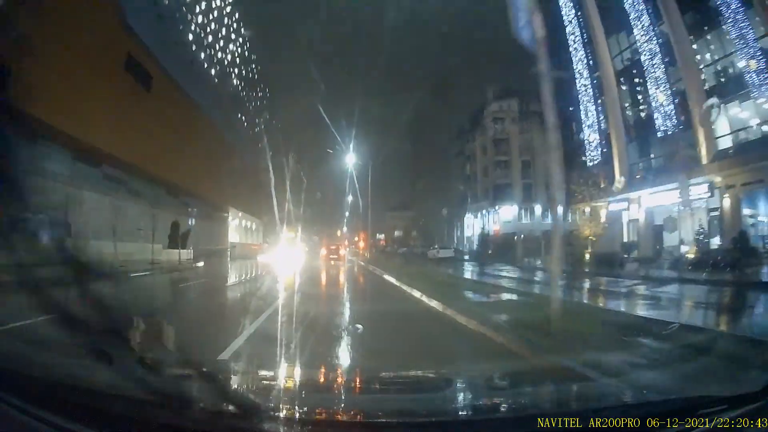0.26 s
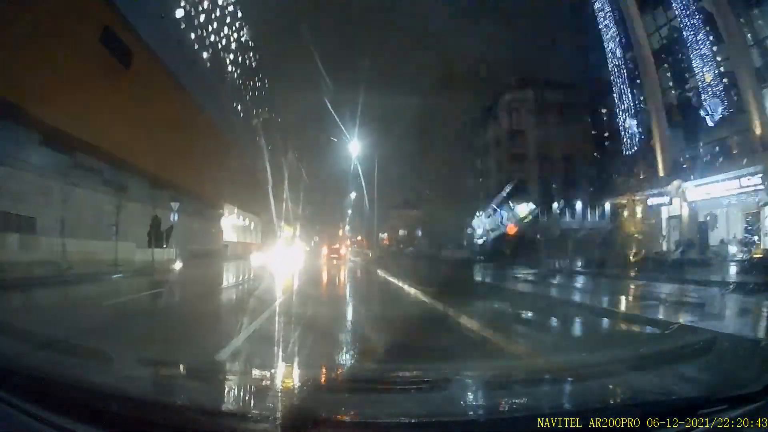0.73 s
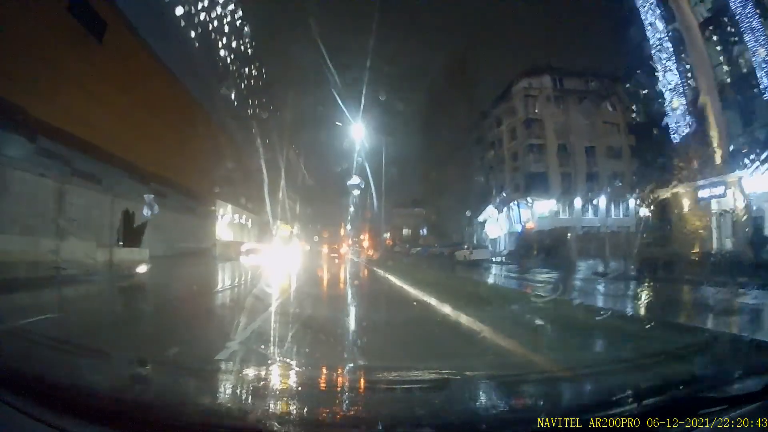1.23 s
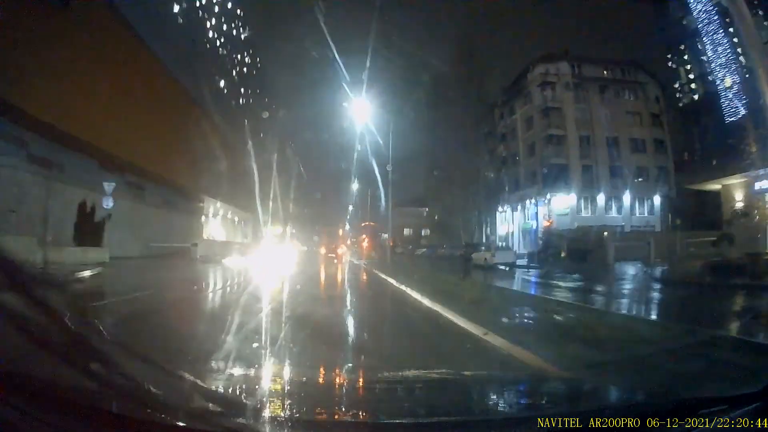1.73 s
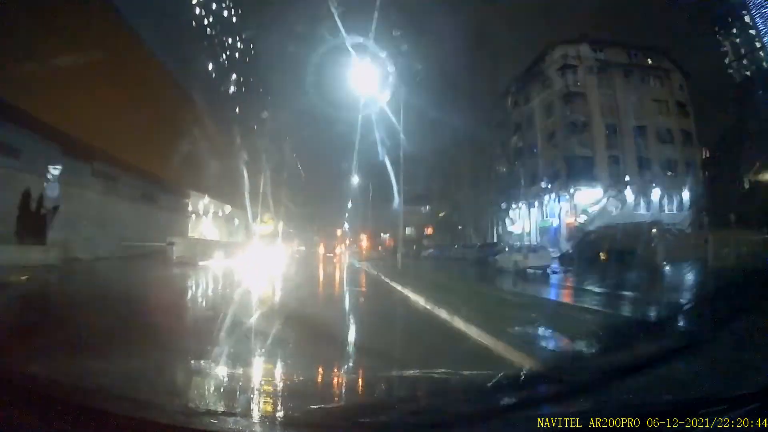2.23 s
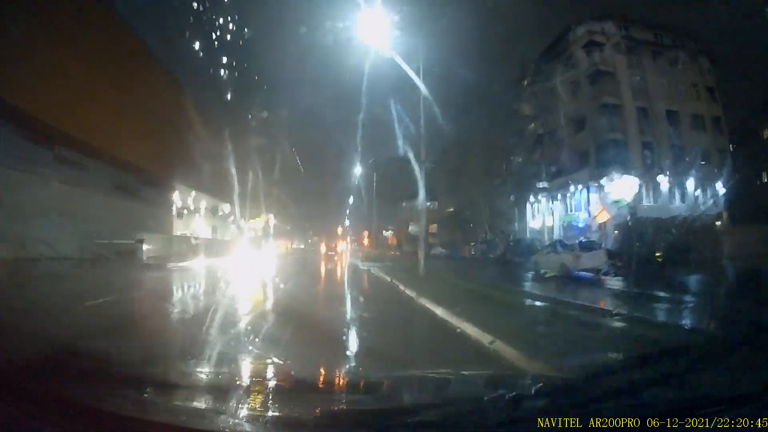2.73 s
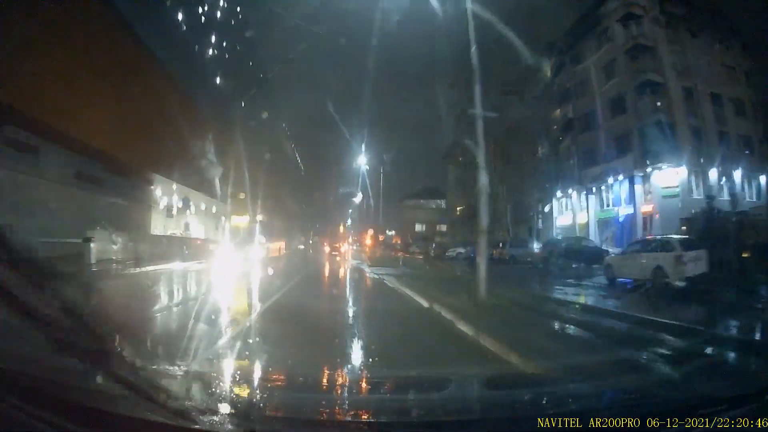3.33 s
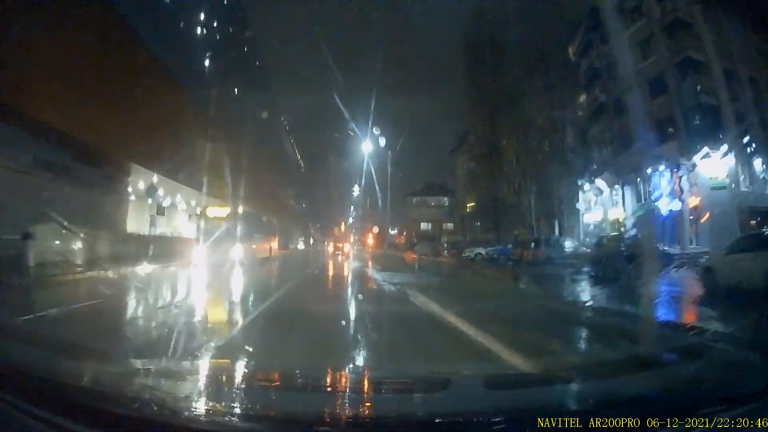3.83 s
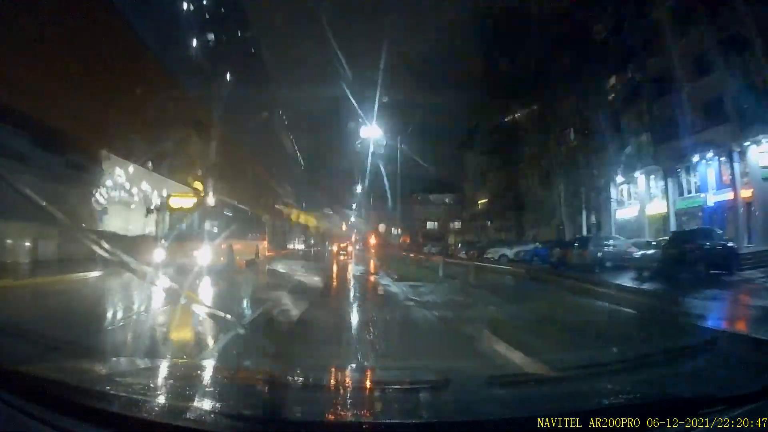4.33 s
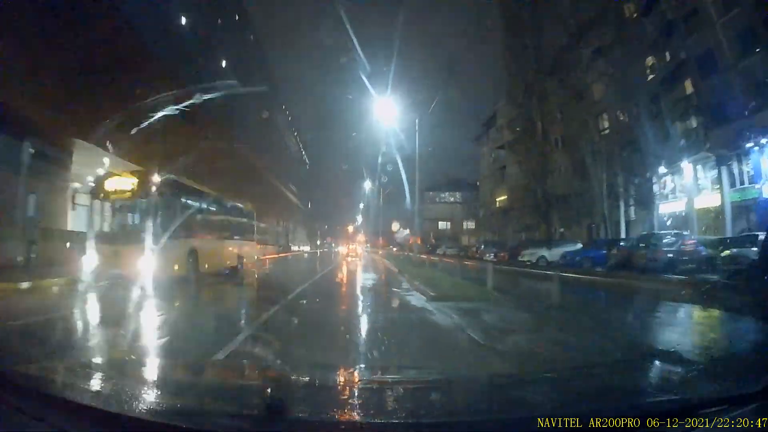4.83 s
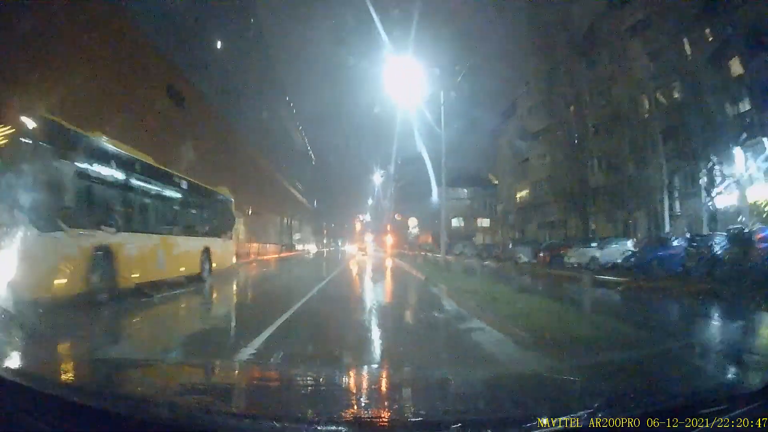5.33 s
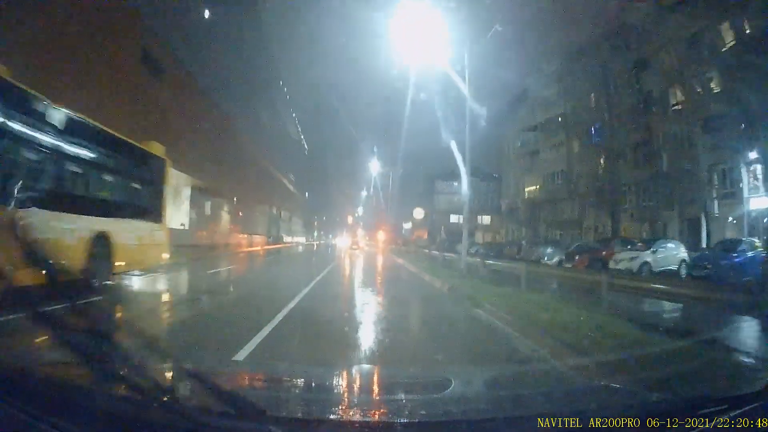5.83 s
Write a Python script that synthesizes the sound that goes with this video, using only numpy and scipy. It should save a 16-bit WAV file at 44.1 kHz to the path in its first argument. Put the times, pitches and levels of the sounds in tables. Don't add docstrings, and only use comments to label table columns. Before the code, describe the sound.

A small car cabin heard through a cheap, overloaded dashboard microphone. A road bump opens as a wiper stroke finishes. The low engine hum rises slightly, with soft tyre rumble and ticking raindrops. Further strokes stutter and squeak on the windscreen, each followed by a scuffing flip. Rough road rumbles around four seconds, the engine slackens, a last long squeak comes, and finally a deep bump.

```python
import sys
import numpy as np
from scipy import signal
from scipy.fft import rfft, irfft, next_fast_len
from scipy.io import wavfile
from scipy.ndimage import uniform_filter1d, map_coordinates

SR = 44100
rng = np.random.default_rng(int(sys.argv[2]) if len(sys.argv) > 2 else 0)


def store_pcm(level_fs):
    pcm = np.round(np.clip(level_fs, -1, 1) * 32767).astype(np.int16)
    wavfile.write(sys.argv[1], SR, np.atleast_2d(pcm).T)


def ratio(d):
    e = np.asarray(d, float) / 20
    return 10 ** e


N = 267687
T = np.arange(N) / SR


def unit(x):
    return x / np.sqrt(np.mean(x ** 2) + 1e-20)


def along(points, hz):
    f, v = np.transpose(points)
    return np.interp(np.log(hz + 1), np.log(f + 1), v)


def curves(rows):
    s, *cols = np.transpose(rows)
    return [np.interp(T, s, c) for c in cols]


def gate(tables, fade, tail):
    total = 0
    for rows in tables:
        inside_s = np.minimum(T - rows[0][0] + fade, rows[-1][0] + tail - T)
        total = total + np.clip(inside_s / fade, 0, 1)
    return np.clip(total, 0, 1)


def swell(s, half_s):
    return np.exp(-((T - s) / half_s) ** 4)


def wobble(rate):
    return map_coordinates(rng.standard_normal(int(N * rate / SR) + 4), [T * rate])


def filtered(x, response):
    m = next_fast_len(N + SR // 2)
    return irfft(rfft(x, m) * response(np.fft.rfftfreq(m, 1 / SR)), m)[..., :N]


def noise(spectrum):
    return unit(filtered(rng.standard_normal(N), lambda hz: ratio(along(spectrum, hz))))


def body(modes):
    def response(f):
        total = 0
        for k, (c, width, db) in enumerate(modes):
            total = total + (-1) ** k * ratio(db) * 1j * f * width / (c * c - f * f + 1j * f * width)
        return total
    return response


def grains(rate, spread_db):
    draw = rng.random((3, N))
    return (draw[0] < rate / SR) * np.sign(draw[1] - .5) * ratio(-spread_db * np.log(draw[2] + 0.00043))


def steady(x, span_s):
    return x / np.sqrt(np.abs(uniform_filter1d(x ** 2, int(span_s * SR))) + 1e-12)


# frequency in Hz, level in dB per Hz.
THUMP = [(8, -20), (18, -4), (38, 0), (47, -3), (56, -8), (70, -9), (85, -12), (130, -17), (180, -28),
         (400, -120)]
# frequency in Hz, level in dB per Hz.
ROAR = [(88, -22.5), (150, 4.5), (178, -3.5), (210, 1), (237, -0.5), (463, -0.5), (591, -6.5), (702, -5.5),
        (843, -9), (1220, -11.5), (1700, -28.5), (2210, -59), (3740, -120)]
# frequency in Hz, level in dB per Hz.
SPRAY = [(940, -26), (1600, -4.5), (1780, -0.5), (2370, -3), (2970, 1.5), (3180, -2), (3750, -5.5),
         (4280, -11.5), (5560, -47), (9420, -120)]
# centre in seconds, rise in dB, half length in seconds.
PATCHES = [
    (0.05, 5.5, .08),
    (3.764, 3.5, 0.061),
    (3.979, 8, 0.1),
    (4.499, 2.5, 0.18),
]


def road(turn):
    thump_db = -20.5 + sum(db * swell(s, half_s) for s, db, half_s in PATCHES)
    thump = ratio(thump_db) * unit(ratio(3.1 * wobble(14)) * noise(THUMP))
    roar = ratio(-33.5) * unit(ratio(0.28 * wobble(7) + 0.91 * np.sin(turn)) * noise(ROAR))
    puff = ratio(-60 * np.arange(SR // 20) / SR / 0.014)
    splat = signal.fftconvolve(np.abs(grains(rate=50, spread_db=-2)), puff)[:N]
    drops = unit(splat * noise(SPRAY))
    hiss = unit(ratio(0.59 * wobble(35)) * noise(SPRAY))
    return thump + roar + ratio(-55) * (hiss + ratio(-2.5) * drops)


# start in seconds, peak in dB, body pitch in Hz, t60 in seconds.
BUMPS = [
    (-.005, -9, 48, .1),
    (6.047, -3, 50, 1),
]


def bumps():
    total = 0
    for s, db, hz, t60 in BUMPS:
        decay = ratio(db - 60 * np.abs(T - s) / t60) * (T > s)
        total = total - decay * np.sin(2 * np.pi * hz * (T - s))
    return total


# time in seconds, firing rate in Hz.
REVS = [(0.06, 48.9), (0.76, 51.3), (1.14, 52.5), (1.55, 53.0), (1.9, 53.7), (2.18, 54.7), (2.6, 55.5),
        (4.16, 55.56), (4.46, 55.1), (4.82, 54.4), (5.13, 54.0), (5.46, 53.1), (5.8, 51.8)]
# time in seconds, level in dB.
BOOM = [(0.0, -11), (0.25, -10), (1.52, -17.5), (1.55, -32.5), (1.64, -22.5), (1.94, -37), (2.06, -17),
        (2.28, -13), (3.76, -11), (5.05, -14.5), (5.15, -27), (5.26, -19), (5.37, -31), (5.42, -22),
        (5.74, -25), (5.84, -19), (5.91, -26), (6.06, -40)]
# multiple of the firing rate, level in dB re the second order.
CRANK = [(.5, -4), (1.5, -21), (2.5, -11.5), (3, -21), (4, -24.5)]
# time in seconds, frequency in Hz, level in dB.
WHINE = [(0, 677, -51.5), (.5, 699.5, -42.5), (1, 712, -41), (1.7, 739.5, -45), (2.3, 753, -53.5),
         (4, 778, -54.5), (6.07, 725, -55)]


def engine():
    (rate_hz,), (boom_db,) = curves(REVS), curves(BOOM)
    turn = 2 * np.pi * np.cumsum(rate_hz) / SR - np.pi / 2
    boom = ratio(boom_db + 0.86 * wobble(13)) * np.sin(turn + 0.27 * wobble(13))
    throttle_closed = np.clip((T - 4.34) / 0.23, 0, 1)
    second_db = -27 - 5.5 * throttle_closed + 3.1 * wobble(2)
    orders = np.sin(2 * turn - 1.6)
    for multiple, db in CRANK:
        orders = orders + ratio(db + 2.8 * wobble(9.3)) * np.sin(multiple * turn)
    unsteady = ratio(1.6 * wobble(12))
    whine_hz, whine_db = curves(WHINE)
    whine_phase = 2 * np.pi * np.cumsum(whine_hz) / SR + .5 * wobble(25)
    whine = ratio(whine_db + 4.6 * wobble(30)) * np.sin(whine_phase)
    return np.sqrt(2) * (boom + ratio(second_db) * unsteady * orders + whine), turn


def cabin(x):
    t = np.arange(SR // 8) / SR
    tail = rng.standard_normal(len(t)) * ratio(-60 * t / 0.063)
    return signal.fftconvolve(x, tail / np.linalg.norm(tail))[:N]


# time in seconds, peak in dB.
SNAPS = [(0.0263, -27.5), (0.1116, -30.5), (0.616, -33.5), (1.178, -35.5), (1.2243, -23), (1.3422, -29),
         (1.6, -30.5), (1.7471, -31), (2.5793, -33.5), (2.6422, -29), (2.6616, -24), (2.722, -35.5),
         (2.744, -25), (2.7762, -30), (2.814, -29.5), (3.5232, -31), (3.822, -31), (3.9687, -34.5),
         (4.0265, -24), (4.0614, -24.5), (4.0887, -24), (4.509, -35.5), (4.5733, -32), (4.8276, -29),
         (5.2283, -33), (5.38, -35), (5.4183, -31), (5.4533, -34), (5.4852, -30), (5.5138, -28)]


def snaps():
    out, t = np.zeros(N + SR), np.arange(SR // 50) / SR
    for s, db in SNAPS:
        tick = ratio(db - 0.5 - 60 * t / 0.021) * rng.standard_normal(len(t))
        out[round(s * SR):][:len(t)] += tick
    return filtered(out[:N], lambda hz: ratio(along(SPRAY, hz) + 2.5))


# start in seconds, scuff in dB, hold in seconds.
FLIP = [
    (0.183, -25, 0.022),
    (1.558, -24.5, 0.026),
    (2.941, -20, 0.02),
    (3.937, -25.5, .002),
    (4.329, -23.5, .024),
    (5.705, -22, 0.039),
]
# frequency in Hz, width in Hz, level in dB.
ARM = [(390, 150, -8), (528, 86, 0), (766, 83, 2.5), (1070, 230, -5), (1190, 225, -8)]
# frequency in Hz, level in dB.
CABIN_COLOUR = [(200, 3), (1350, -2), (1550, -7.5), (2200, -11), (4400, -18)]


def flip():
    rise_s, fall_db_per_s = 0.011, 722
    push = 0
    for s, db, hold_s in FLIP:
        falling_s = np.clip(T - s - rise_s - hold_s, 0, 1)
        push = push + np.clip((T - s) / rise_s, 0, 1) * ratio(db - fall_db_per_s * falling_s)
    scuff = filtered(grains(rate=2700, spread_db=2.0), lambda hz: body(ARM)(hz) * ratio(along(CABIN_COLOUR, hz)))
    return push * steady(scuff, span_s=0.021)


def rubber_chatter():
    chatter = ratio(2.5 * wobble(58)) * grains(rate=2000, spread_db=3.0)
    snap_s, snap_db = np.transpose(SNAPS)
    chatter[np.round(snap_s * SR).astype(int)] = ratio(snap_db + 43.5)
    return chatter


# frequency in Hz, width in Hz, level in dB.
GROAN = [(200, 70, -6), (300, 50, 0)]


def arm_groan(chatter):
    return steady(filtered(chatter, lambda hz: body(GROAN)(hz) ** 2), span_s=0.018)


# frequency in Hz, width in Hz, level in dB.
GLASS = [(450, 16, -4), (747.6, 88, 1.5), (1050, 45, -6), (1169, 12, 1.5), (1390, 160, -12.5),
         (1740, 300, -17), (2130, 300, -16), (3050, 780, -24)]


def glass_judder(chatter, bright_db):
    dull = steady(filtered(chatter, lambda hz: body(GLASS)(hz) * ratio(along(CABIN_COLOUR, hz))), span_s=.09)
    sharp = filtered(dull, lambda hz: hz > 1500)
    return dull + (ratio(bright_db) - 1) * sharp


# frequency in Hz, level in dB.
LIP = [(600, -8.5), (800, 9), (1250, -3), (1500, -21), (1750, -14), (2200, -33.5), (3000, -38.5),
       (4200, -54)]


def squeak(slip_hz, first_db, squeak_db, third_db, bright_db):
    slip = 2 * np.pi * np.cumsum(slip_hz * (1 + .02 * wobble(140))) / SR
    total = 0
    for k in range(1, 9):
        level_db = squeak_db + along(LIP, k * slip_hz) - along(LIP, 2 * slip_hz) + bright_db * (k > 3)
        if k == 1:
            level_db = first_db
        elif k == 3:
            level_db = third_db
        phase = k * (slip + .2 * wobble(110))
        total = total + ratio(level_db + 1.6 * wobble(90)) * np.sin(phase)
    return total


# time in seconds, slip rate in Hz, grip in dB.
BLADE = [
    [(0.0, 383.9, -23.5), (0.03, 394.8, -19), (0.05, 397.2, -16), (0.07, 385.1, -15.5), (0.095, 386.3, -24),
     (0.118, 396.3, -18), (0.135, 409, -24), (0.15, 481, -35.5)],
    [(1.178, 374.4, -18), (1.22, 352.7, -18), (1.25, 360.4, -21.5), (1.29, 403, -18.5),
     (1.34, 419.6, -18.5), (1.395, 450, -26), (1.43, 453.3, -21), (1.475, 452.6, -19.5),
     (1.505, 486, -29.5)],
    [(2.582, 355, -22.5), (2.662, 400, -15), (2.72, 422, -18.5), (2.765, 434, -18.5), (2.81, 424.4, -21.5),
     (2.835, 435.5, -15), (2.875, 376.3, -21)],
    [(3.973, 378, -13.5), (4.003, 372, -15), (4.022, 386.7, -20.5), (4.078, 395.7, -18.5),
     (4.098, 409.5, -11), (4.125, 390, -20), (4.165, 411, -19.5), (4.195, 480, -29.5), (4.245, 480, -25.5)],
    [(5.295, 390, -36), (5.345, 390, -24), (5.41, 390, -15.5), (5.52, 373.5, -18), (5.555, 387.4, -24),
     (5.59, 445, -20.5), (5.66, 460, -27.5)],
]
# lock in seconds, groan in seconds, groan half length in seconds,
# groan in dB, locked brightness in dB.
SWEEPS = [
    (0.148, .001, 0.033, -21, -1.5),
    (1.27, 1.256, 0.051, -29, 0.5),
    (2.644, 2.612, .048, -31, 1),
    (4.149, 4.052, 0.036, -23, -2.5),
    (5.568, 5.472, 0.11, -32.5, -1),
]
LOOSE_DB = (-0.4, -7.5, -15.5, 0)
LOCKED_DB = (-4.5, -2.26, -13, 2)


def wiper():
    slip_hz, raw_grip_db = curves([row for rows in BLADE for row in rows])
    stop_s, stop_db_per_s, lock_s = .04, 898.5, .042
    halt_db, locked, lock_bright_db = 0, 0, 0
    bend = 0
    for rows, (middle_s, groan_s, half_s, groan_db, stroke_bright_db) in zip(BLADE, SWEEPS):
        end_s = rows[-1][0]
        during = T < end_s + .1
        halt_db = halt_db - stop_db_per_s * np.clip(T - end_s, 0, stop_s) * during
        lock = np.clip((T - middle_s) / lock_s + .5, 0, 1) * during
        locked = locked + lock
        lock_bright_db = lock_bright_db + lock * stroke_bright_db
        bend = bend + ratio(groan_db) * swell(groan_s, half_s)
    grip_db = raw_grip_db + halt_db
    bend = bend + ratio(grip_db - 17)

    over_db = [loose + (tight - loose) * locked for loose, tight in zip(LOOSE_DB, LOCKED_DB)]
    judder_over_db, squeak_over_db, third_over_db, bright_db = over_db
    bright_db = bright_db + lock_bright_db
    firmness_db = raw_grip_db + 20
    judder_db = grip_db + judder_over_db - .2 * firmness_db
    squeak_db = grip_db + squeak_over_db + 1.2 * wobble(45)
    third_db = grip_db + third_over_db + 3 * wobble(35)
    first_db = -31 + 0.22 * firmness_db + 0.05 * (slip_hz - 400) + halt_db + 2.2 * wobble(42)

    pitched = np.sqrt(2) * squeak(slip_hz, first_db, squeak_db, third_db, bright_db)
    chatter = rubber_chatter()
    judder = ratio(judder_db - 0.5) * glass_judder(chatter, bright_db)
    groan = bend * arm_groan(chatter)
    return gate(BLADE, fade=0.0092, tail=stop_s) * (pitched + judder + groan)


def scene():
    hum, turn = engine()
    blades = wiper() + flip()
    walls = ratio(-13) * cabin(blades)
    return (hum + road(turn) + bumps() + blades + walls + snaps())[None]


def band_limit(x):
    return signal.sosfilt(signal.butter(12, 15800, fs=SR, output="sos"), x)


# time in seconds, jump in full scale, settling time in seconds.
CLICK = (1.02027, .4, .004)


def record(dry):
    top = .709
    loud = np.clip(dry, -top, top)
    drift = np.linspace(loud[:, 0], loud[:, -1], N, axis=1)
    narrow = drift + filtered(loud - drift, lambda hz: np.clip((4450 - hz) / 700, 0, 1) ** 1.1)
    s, jump, settle_s = CLICK
    after = T - s
    side = -np.sign(narrow[:, [round(s * SR)]])
    click = side * jump * (after > 0) * np.exp(-np.abs(after) / settle_s)
    return band_limit(np.clip(narrow + click, -top, top))


dry = scene()
out = record(dry)
store_pcm(out)
```